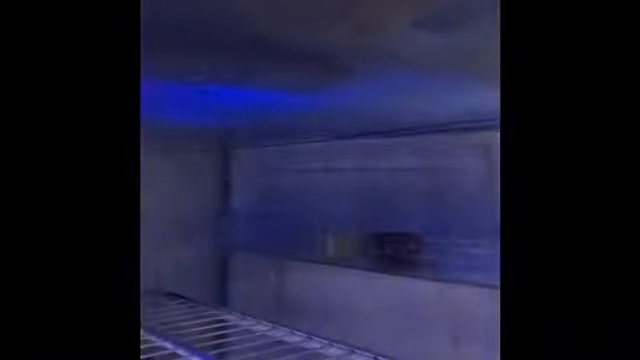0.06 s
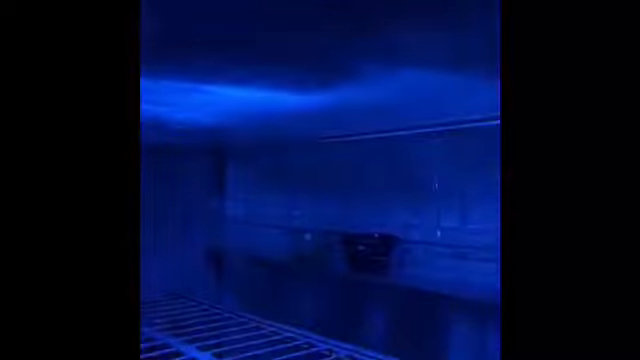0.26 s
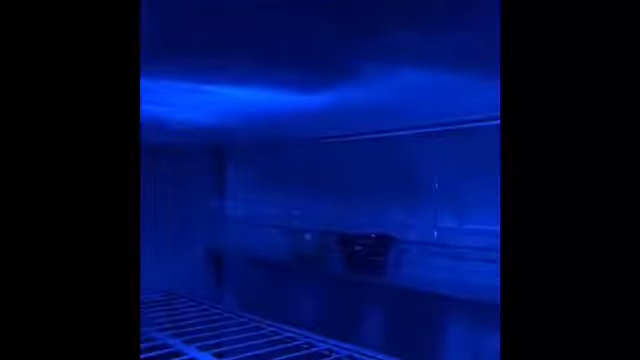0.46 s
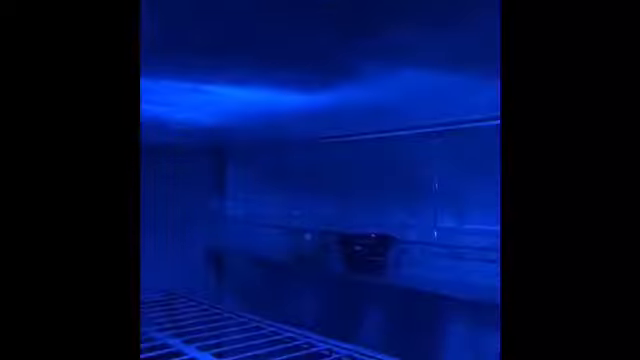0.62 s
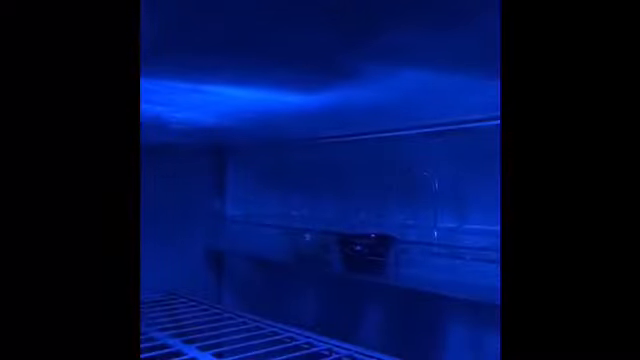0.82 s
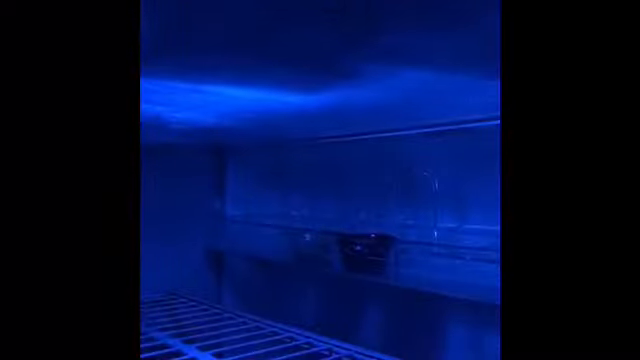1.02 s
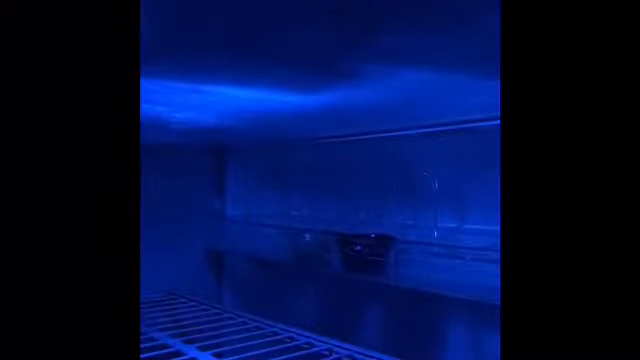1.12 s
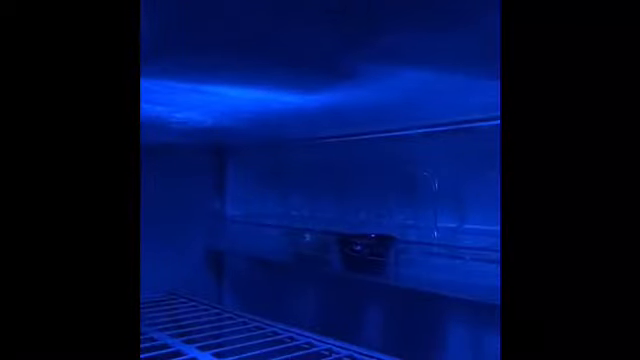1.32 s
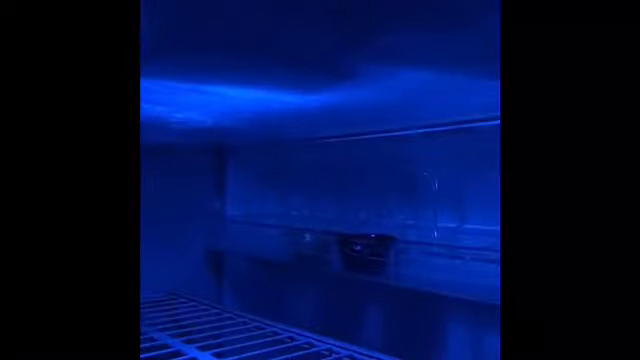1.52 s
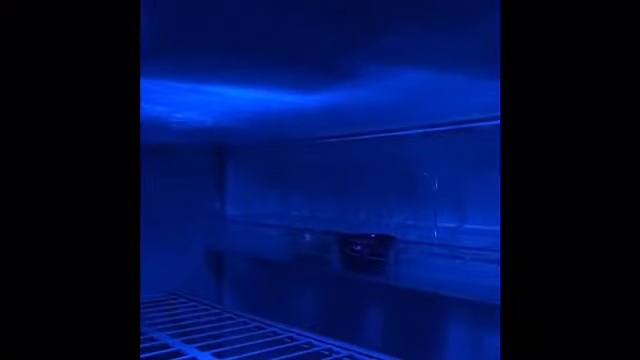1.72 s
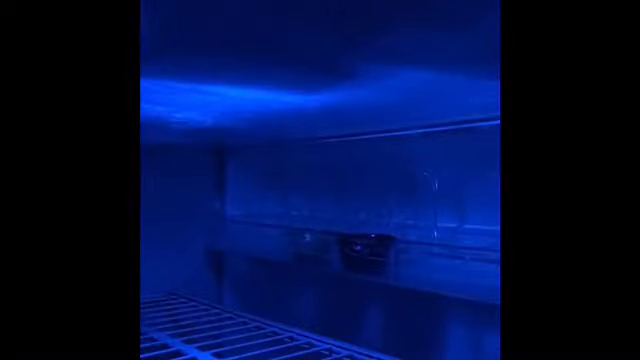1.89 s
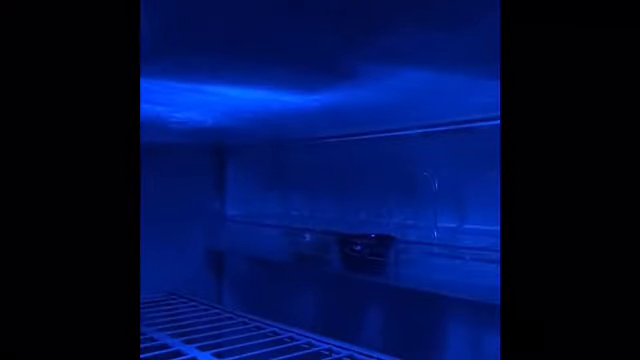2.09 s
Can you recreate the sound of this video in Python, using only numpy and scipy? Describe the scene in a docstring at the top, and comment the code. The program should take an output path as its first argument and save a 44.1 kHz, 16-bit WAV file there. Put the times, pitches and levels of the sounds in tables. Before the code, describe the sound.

A refrigerator door slams shut, heard in mono from a shelf inside. Low motor drone and fan noise, with hinge clicks around 0.2-0.28 s; a brief gasket brush leads to a hard crack and deep air thump at 0.38 s. Racks rattle and the box booms around 0.45-0.7 s, with thin hiss until two dull knocks near 1 s. Quiet fan hum and sparse faint taps continue past 2 s.

```python
"""A low cabinet drone under motor noise and a fan, then hinge clicks: a refrigerator door swings shut,
heard in mono from a shelf inside. The door cracks against its frame with a push of air; racks rattle, the
box booms, and a thin hiss lasts until two seating knocks. The fan hums on, with a few soft taps.
Air tones are gliding or steady sines; blows are decaying noise bands and damped modes; the fan, motor,
gasket brush and hiss are coloured noise, with wavering hum tones in the fan and motor."""
import sys
import numpy as np
from scipy.fft import rfft, irfft, next_fast_len
from scipy.io import wavfile
from scipy.ndimage import map_coordinates

SR = 44100
rng = np.random.default_rng(int(sys.argv[2]) if len(sys.argv) > 2 else 0)


def waveform_to_disk(signal):
    """Save audio, clipped to [-1, 1], as 16-bit WAV at the path in sys.argv[1]."""
    frames = np.transpose(np.atleast_2d(signal))
    scaled = np.clip(frames, -1, 1) * 32767
    samples = np.round(scaled).astype(np.int16)
    wavfile.write(sys.argv[1], SR, samples)


N = 94815  # length in samples

# Every COLOUR table is a spectrum. Each row: frequency in Hz, relative level in dB.
# Every MODES table is a set of resonances. Each row: frequency in Hz, relative level in dB, t60 in s.
# Where blows list a tilt, it runs above 500 Hz and pivots at 2 kHz; their t60 is that of the 2 kHz band.

# Low drone of the cabinet, stirred by the door. Each row: time in seconds, level in dB.
DRONE_LEVEL = [(0, -36), (.07, -34.5), (.125, -42), (.195, -26), (.25, -29.5), (.32, -24.5), (.355, -38),
               (.40, -26.5), (.435, -20), (.47, -49), (.55, -34), (.65, -46.5), (.8, -47.5), (1.0, -54.5),
               (1.2, -69)]
DRONE_HZ = 49.34

# Fan and compressor inside the box: spectrum of the low rush, then of the treble.
FAN_COLOUR = [(15, -43), (28, -15.5), (39, 0), (52, -5.5), (65, -9.5), (86, -15), (100, -3), (125, -9),
              (150, -1), (200, -6), (260, -9.5), (310, -9.5), (410, -16), (490, -24.5), (620, -22),
              (680, -29), (790, -19.5), (970, -29.5), (1040, -23.5), (1500, -30), (2200, -44.5),
              (3000, -69)]
FAN_DB = -47.5
FAN_TREBLE_COLOUR = [(900, 0.5), (2000, -2.5), (3000, -2), (4000, -1.5), (5000, -7), (6500, -10.5),
                     (8000, -16.5), (10500, -22), (15500, -23)]
# Level of the fan's treble. Each row: time in seconds, level in dB.
FAN_TREBLE_LEVEL = [(1.05, -67), (1.376, -70.5), (1.65, -70), (2.15, -65.5)]
# Hum once the door is shut. Each row: frequency in Hz, level in dB.
SHUT_HUM = [(48.4, -54), (183, -54.5), (226, -59), (363, -67), (420, -67), (630, -74.5), (818.3, -64.5),
            (920.5, -66), (1023, -70), (4037, -86.5)]
# Hum past the open door. Each row: frequency in Hz, level in dB before the door's share.
OPEN_HUM = [(108, -49.5), (149, -46.5), (183, -50), (819, -61), (920, -53.5)]
# Motor noise past the open door: spectrum, then its level before the door's share.
OPEN_COLOUR = [(60, -11), (130, 8.5), (250, 1), (450, -19.5), (700, -16), (900, -9), (1200, -14),
               (1700, -24.5), (2400, -34.5), (4000, -35.5), (6500, -41.5), (10000, -58.5), (15500, -57.5)]
OPEN_DB = -43
# How much of the motor comes past the door. Each row: time in seconds, gain in dB.
DOOR_OPEN = [(0, -1), (.15, -1.5), (.25, 0.5), (.37, -4), (.44, -41.5)]
HUM_RATE_HZ = 13  # random knots a second in the hum's waver

# Hinge and plastic clicks. Each row: start in seconds, level in dB, tilt in dB per octave, t60 in s.
CLICKS = [(.133, -60.5, 4, 0.17), (.182, -52.5, 5.5, 0.27), (.205, -28, -4.5, 0.091),
          (.2185, -62, -8, 0.043), (.27, -29.5, 0.5, 0.083), (.2795, -33.5, -6.5, 0.069),
          (.609, -53.5, 8.5, 0.072), (.668, -64, 10, .08), (.6835, -50, 11, 0.06),
          (1.326, -59.5, 2.5, 0.12)]
CLICK_COLOUR = [(150, -31), (250, -3), (490, -23.5), (614, -3), (1120, -8), (1480, -5.5), (2200, -10.5),
                (2900, -7), (3600, -15.5), (5200, -17), (6200, -13), (7400, -23.5), (15500, -37.5)]
# Resonances of the hinge bracket, and their level against the click.
BRACKET_MODES = [(595.7, -2, 0.11), (1570, -13, .06), (2850, -7, .06), (6160, -12, 0.032)]
BRACKET_DB = -6

# Dull knocks of the cabinet. Each row: start in seconds, level in dB.
KNOCKS = [(0.215, -41.5), (0.282, -42), (.385, -31), (0.421, -32), (.467, -41), (.488, -20), (.968, -39.5),
          (.998, -47)]
# Resonances of the cabinet.
CABINET_MODES = [(111, -9, 0.37), (165, -1, 0.065), (222, 1, 0.088), (267.1, -3.5, 0.18), (305.7, -4.5, .1),
                 (360, -8.5, 0.1), (425.4, -6.5, 0.2), (522.5, -11, 0.11), (629, -8, 0.058),
                 (770, -16.5, 0.12)]

# The gasket brushing the frame. Each row: time in seconds, level in dB.
BRUSH_LEVEL = [(.33, -82), (.35, -51), (.378, -36), (.384, -25), (.39, -94)]
BRUSH_COLOUR = [(150, -1.5), (500, -8.5), (1500, -5), (2500, -18.5), (6000, -24.5), (9000, -36),
                (15500, -36.5)]

# Air push: start, envelope peak and its delay, then the pitch glide and its time constant.
PUSH_S, PUSH_DB, PUSH_RISE_S = 0.3825, -2.5, 0.013
PUSH_FROM_HZ, PUSH_TO_HZ, PUSH_GLIDE_S = 83, 37.5, 0.016

# The door meeting the frame. Each row: start in seconds, level in dB, tilt in dB per octave, t60 in s.
SLAM = [(0.3833, -14.5, 1, .04), (0.3866, -14.5, -1.5, 0.06)]
SLAM_COLOUR = [(88, -34), (160, -3.5), (210, -16.5), (400, -17.5), (510, -27.5), (1220, -26), (1370, -14),
               (1850, -20), (2300, -24), (3100, -23.5), (3700, -23.5), (4300, -28), (4900, -18.5),
               (5500, -27), (6500, -28), (8000, -39), (15500, -54)]
SLAM_TAIL_DB, SLAM_TAIL_T60 = -32.5, 0.37  # t60 in s
# Resonances of the plastic liner, and their common gain.
LINER_MODES = [(645, -18, 0.2), (969, -20, 0.21), (1403, -0.5, .05), (1930, -9, 0.055), (2615, -9.5, 0.051),
               (3590, -3, 0.031), (3726, -4.5, .04), (3975, -14.5, 0.12), (4940, 1, 0.012),
               (6795, -24, .06)]
LINER_DB = -14.5

# Thin hiss: spectrum, then the times it starts to open and to close.
HISS_COLOUR = [(500, -1), (2000, -1.5), (3600, -3), (6000, -6), (10000, -15), (15500, -16.5)]
HISS_FROM_S, HISS_TO_S, HISS_DB = 0.39, 0.966, -63.5

# Racks and jars in the door. Each row: start in seconds, level in dB, tilt in dB per octave, t60 in s.
RATTLES = [(0.431, -37.5, -1, .08), (.439, -46.5, 7, 0.063), (.454, -22.5, 1, 0.08),
           (.458, -27, -1.5, 0.031), (0.464, -25.5, -2, 0.11), (.482, -23, -7.5, .07),
           (0.488, -36.5, 5.5, 0.09), (0.498, -28.5, 1.5, 0.079), (.506, -33, 6, 0.078),
           (.515, -45.5, -4, 0.31), (0.639, -52, 1.5, 0.088)]
RATTLE_COLOUR = [(180, -32), (300, -13.5), (568, -7.5), (738, -25), (1010, -3.5), (1150, -11.5), (1470, -6),
                 (1880, -16.5), (2140, -19.5), (2320, -24.5), (3550, -22.5), (4390, -28.5), (15000, -63)]

# Boom of the sealed box: start, rise and pitch glide, then gains in dB and t60 in s of boom and afterglow.
BOOM_S, BOOM_RISE_S = 0.4655, 0.039
BOOM_FROM_HZ, BOOM_TO_HZ, BOOM_GLIDE_S = 61, 108.5, 0.028
BOOM_DB, BOOM_T60 = -15.5, 0.22
AFTER_DB, AFTER_T60 = -17, 0.9  # afterglow gain is relative to the boom

# The seal seating. Each row: start in seconds, level in dB, tilt in dB per octave, t60 in s.
SEATING = [(.968, -40.5, -11.5, .06), (0.9973, -35, -1, 0.073)]
SEATING_COLOUR = [(100, -10.5), (300, -9), (700, -1), (1200, 5.5), (1600, -0.5), (2100, -5), (2600, -2.5),
                  (3300, -6), (4300, -12.5), (5500, -25), (8000, -33), (10000, -52)]

# Soft taps in the settling cabinet. Each row: start in seconds, level in dB.
TAPS = [(1.178, -44.5), (1.364, -53), (1.546, -49), (1.767, -51), (2.03, -53.5)]
TAP_COLOUR = [(150, 1), (400, -10.5), (620, -1), (780, 0.5), (1080, -4), (1350, -24), (1600, -9.5),
              (2200, -31), (5000, -35), (12000, -53.5)]
TAP_T60, TAP_ATTACK_S = 0.12, 0.0014  # both in s, t60 at 2 kHz
# Resonances sounded by each tap, and their level against it.
TAP_MODES = [(429, 0, 0.16), (607, 3.5, 0.13), (785, -9.5, .1), (906, 4, 0.11), (1068, 1.5, 0.13),
             (1206, -5, 0.13), (1385, -15, 0.072), (1597, -9, 0.35), (1660, -19, 0.07)]
TAP_RING_DB = -4.5

# All blows: rise time constant, how much longer low pitches ring (exponent), uneven panel response.
ATTACK_S, BASS_RING = 0.0004, 0.12
RIPPLE_DB, RIPPLE_HZ = 2, 100.14  # standard deviation and knot spacing
TOP_HZ = 16000  # band limit of the recorder


def amp(db):
    """Decibels to gain."""
    return 10 ** (np.asarray(db) / 20)


def unit(x):
    """Scale to rms 1."""
    return x / np.sqrt(np.mean(x ** 2) + 1e-20)


def colour(points, hz):
    """Gain at hz, interpolated between (Hz, dB) points on a log frequency axis."""
    point_hz, point_db = np.transpose(points)
    return amp(np.interp(np.log(hz + 1), np.log(point_hz + 1), point_db))


def since(start_s):
    """Seconds since start_s for every sample, zero before."""
    return np.maximum(np.arange(N) / SR - start_s, 0)


def level(rows):
    """Gain per sample of a (s, dB) curve, held flat beyond its ends."""
    return amp(np.interp(since(0), *np.transpose(rows)))


def wobble(rate_hz):
    """A smooth random curve with rate_hz knots a second."""
    knots = rng.standard_normal(1024)
    return map_coordinates(knots, [since(0) * rate_hz], mode="wrap")


def noise(points):
    """Random noise of rms 1 with the given colour."""
    m = next_fast_len(N)
    spectrum = rfft(rng.standard_normal(m))
    gain = colour(points, np.fft.rfftfreq(m, 1 / SR))
    return unit(irfft(spectrum * gain, m)[:N])


def add(out, start_s, x):
    """Mix x into out at start_s, cutting what runs past the end."""
    part = out[int(start_s * SR):][:len(x)]
    part += x[:len(part)]


def decay(t, t60):
    """Exponential fall of 60 dB in t60 seconds."""
    return np.exp(-np.log(1000) * t / t60)


def blow(points, tilt_db, t60, attack_s=ATTACK_S):
    """A blow on a panel: random-phase noise whose bands die away separately, the low ones later."""
    size = 16384
    hz = np.fft.rfftfreq(size, 1 / SR) + 1
    t = np.arange(size) / SR
    tilt = amp(tilt_db * np.log2(np.maximum(hz, 500) / 2000))
    phase = np.exp(2j * np.pi * rng.random(len(hz)))
    knots = rng.standard_normal(1024)
    ripple = amp(RIPPLE_DB * map_coordinates(knots, [hz / RIPPLE_HZ], mode="wrap"))
    spectrum = colour(points, hz) * tilt * phase * ripple

    # overlapping octave bands that sum to the whole spectrum
    centres = 250 * 2.0 ** np.arange(7)
    shares = [np.interp(np.log(hz), np.log(centres), row) for row in np.eye(len(centres))]
    bands = np.array([irfft(spectrum * share) for share in shares])
    band_t60 = t60 * (2000 / centres[:, None]) ** BASS_RING
    ringing = (bands * decay(t, band_t60)).sum(0)
    # level is set by the noise before it decays
    return ringing / bands.sum(0).std() * (1 - np.exp(-t / attack_s))


def blows(rows, points):
    """A series of blows sharing one colour, each with its own level, tilt and decay."""
    out = np.zeros(N)
    for start_s, db, tilt_db, t60 in rows:
        add(out, start_s, amp(db) * blow(points, tilt_db, t60))
    return out


def ring(modes, scatter_db):
    """Damped sine modes whose levels scatter at random from blow to blow."""
    t = np.arange(SR // 2) / SR
    out = np.zeros(len(t))
    for hz, db, t60 in modes:
        gain = amp(db + scatter_db * rng.normal())
        out -= gain * np.sin(2 * np.pi * hz * t) * decay(t, t60)
    return out * (1 - np.exp(-t / ATTACK_S))


def glide(t, from_hz, to_hz, glide_s):
    """A sine whose pitch settles exponentially from one value to another."""
    settling = (from_hz - to_hz) * glide_s * (1 - np.exp(-t / glide_s))
    return np.sin(2 * np.pi * (to_hz * t + settling))


def hum(lines, waver):
    """Motor tones, each multiplied by a random complex curve so level and phase waver."""
    out = np.zeros(N)
    for hz, db in lines:
        drift = 1 + waver * (wobble(HUM_RATE_HZ) + 1j * wobble(HUM_RATE_HZ))
        tone = np.exp(2j * np.pi * (hz * since(0) + rng.random()))
        out += amp(db) * np.sqrt(2) * np.real(drift * tone)
    return out


def drone():
    """The air in the box drones as one low sine that the door stirs up and down in level."""
    return np.sqrt(2) * level(DRONE_LEVEL) * np.sin(2 * np.pi * DRONE_HZ * since(0))


def motor_past_door():
    """Motor noise and hum reach the shelf past the open door and drop away as it shuts."""
    motor = amp(OPEN_DB) * noise(OPEN_COLOUR) + hum(OPEN_HUM, waver=0.2)
    return level(DOOR_OPEN) * motor


def fan():
    """Fan rush is coloured noise throughout; hum lines fade in as the door shuts."""
    rush = amp(FAN_DB) * noise(FAN_COLOUR)
    treble = level(FAN_TREBLE_LEVEL) * noise(FAN_TREBLE_COLOUR)
    shut = np.minimum(since(PUSH_S) / 0.05, 1)
    return rush + treble + shut * hum(SHUT_HUM, waver=0.24)


def clicks():
    """Hinge and plastic click: a short noise blow with the bracket's modes ringing under it."""
    out = blows(CLICKS, CLICK_COLOUR)
    for start_s, db, _, _ in CLICKS:
        add(out, start_s, amp(db + BRACKET_DB) * ring(BRACKET_MODES, scatter_db=3.5))
    return out


def cabinet_knocks():
    """Dull knocks ring the low damped modes of the cabinet."""
    out = np.zeros(N)
    for start_s, db in KNOCKS:
        add(out, start_s, amp(db) * ring(CABINET_MODES, scatter_db=2.5))
    return out


def gasket_brush():
    """The gasket brushes the frame: coloured noise that swells just before the slam."""
    return level(BRUSH_LEVEL) * noise(BRUSH_COLOUR)


def air_push():
    """The door pushes the air in the box: a brief low pulse that glides down in pitch."""
    t = since(PUSH_S)
    u = t / PUSH_RISE_S
    envelope = (u * np.exp(1 - u)) ** 2  # peaks at u = 1
    return amp(PUSH_DB) * envelope * glide(t, PUSH_FROM_HZ, PUSH_TO_HZ, PUSH_GLIDE_S)


def slam():
    """The door cracks against the frame with a longer faint tail and rings the plastic liner."""
    out = blows(SLAM, SLAM_COLOUR)
    contact_s = SLAM[0][0]
    add(out, contact_s, amp(SLAM_TAIL_DB) * blow(SLAM_COLOUR, 0, SLAM_TAIL_T60))
    add(out, contact_s, amp(LINER_DB) * ring(LINER_MODES, scatter_db=4))
    return out


def hiss():
    """A thin hiss, likely air drawn past the gasket: coloured noise that stops as the seal seats."""
    opening = np.minimum(since(HISS_FROM_S) / 0.01, 1)
    closing = np.minimum(since(HISS_TO_S) / 0.0045, 1)
    return amp(HISS_DB) * (opening - closing) * noise(HISS_COLOUR)


def rack_rattles():
    """Racks and jars in the door rattle as a run of short noise blows."""
    return blows(RATTLES, RATTLE_COLOUR)


def box_boom():
    """The air in the box booms, gliding up as the seal tightens, with a fast and a slow decay."""
    t = since(BOOM_S)
    fall_t = since(BOOM_S + BOOM_RISE_S)
    rise = np.sqrt(np.minimum(t / BOOM_RISE_S, 1))
    fall = decay(fall_t, BOOM_T60) + amp(AFTER_DB) * decay(fall_t, AFTER_T60)
    return amp(BOOM_DB) * rise * fall * glide(t, BOOM_FROM_HZ, BOOM_TO_HZ, BOOM_GLIDE_S)


def seal_seating():
    """The seal seats with two knocks, each a short noise blow."""
    return blows(SEATING, SEATING_COLOUR)


def soft_taps():
    """The settling cabinet taps: soft-edged noise blows with damped modes ringing under them."""
    out = np.zeros(N)
    for start_s, db in TAPS:
        add(out, start_s, amp(db) * blow(TAP_COLOUR, 0, TAP_T60, TAP_ATTACK_S))
        add(out, start_s, amp(db + TAP_RING_DB) * ring(TAP_MODES, scatter_db=3.0))
    return out


def scene():
    """Everything as heard on a shelf inside, summed to one channel."""
    running = drone() + motor_past_door() + fan()
    closing = clicks() + cabinet_knocks() + gasket_brush() + air_push() + slam()
    shut = hiss() + rack_rattles() + box_boom() + seal_seating() + soft_taps()
    return (running + closing + shut)[None]


def record(dry):
    """The recorder keeps nothing at or above its band limit."""
    m = next_fast_len(N + SR // 2)
    passed = np.fft.rfftfreq(m, 1 / SR) < TOP_HZ
    return irfft(rfft(dry, m) * passed, m)[..., :N]


dry = scene()
out = record(dry)
waveform_to_disk(out)
```